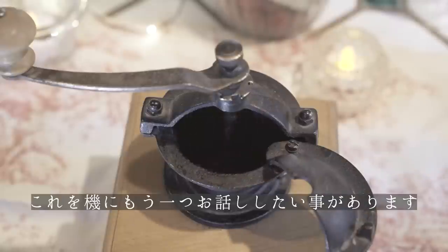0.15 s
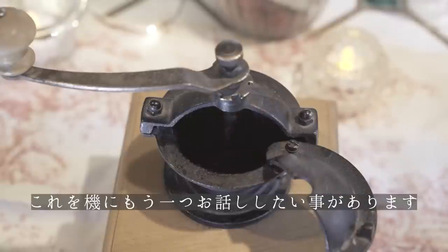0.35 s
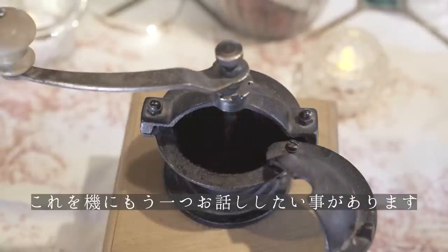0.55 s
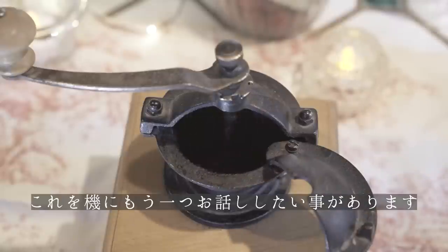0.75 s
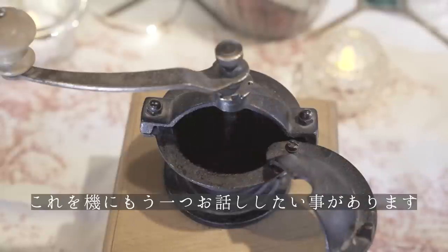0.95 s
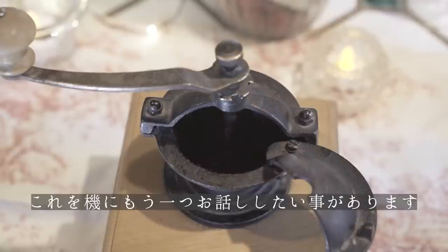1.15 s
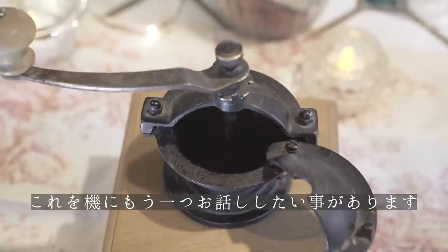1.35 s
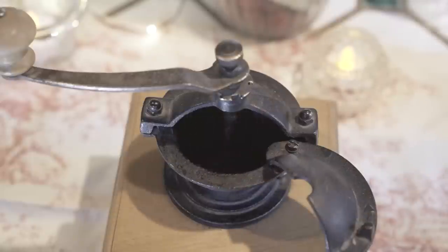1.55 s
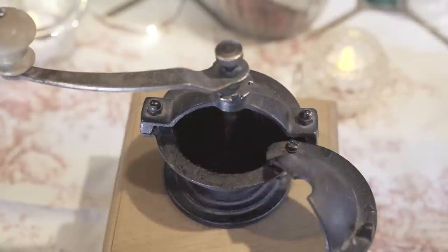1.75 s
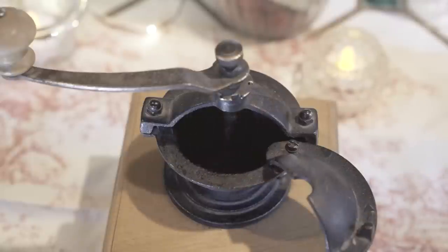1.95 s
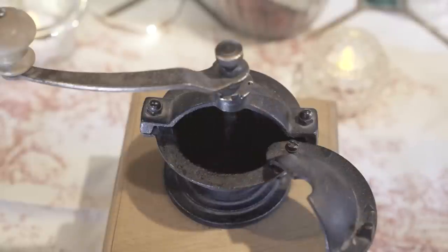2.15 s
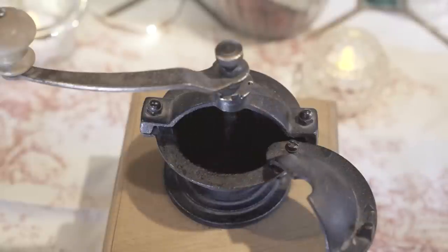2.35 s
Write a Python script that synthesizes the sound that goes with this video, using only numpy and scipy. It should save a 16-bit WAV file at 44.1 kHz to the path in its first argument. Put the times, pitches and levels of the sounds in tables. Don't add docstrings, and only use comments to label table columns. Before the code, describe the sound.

Coffee beans pour in uneven bursts into a hand grinder's cast metal hopper, ticking and pinging brightly, with small wooden box knocks and one lid clink midway; close microphone, small quiet kitchen, mono.

```python
import sys
import numpy as np
from scipy import signal
from scipy.fft import rfft, irfft
from scipy.io import wavfile

SR = 44100
rng = np.random.default_rng(int(sys.argv[2]) if len(sys.argv) > 2 else 0)


def attenuation_scalar(level_db):
    decades = np.asarray(level_db, float) / 20
    return 10 ** decades


def output_pcm(signal):
    pcm = np.clip(np.atleast_2d(signal).T, -1, 1) * 32767
    wavfile.write(sys.argv[1], SR, np.round(pcm).astype(np.int16))


N = 112455

# f/Hz, level/dB, t60/s
HOPPER_MODES = [(873, -16.5, 0.011), (1620, -16.5, 0.035), (1780, -8.5, 0.016), (3470, -10, 0.012),
                (4735, -11, 0.043), (6050, -3.5, 0.0118), (6300, -19, 0.017), (7300, -5, 0.015),
                (7570, -15.5, 0.09), (8590, -14.5, 0.1), (9330, -8.5, 0.019), (10100, -10.5, 0.046),
                (11500, -34, 0.052)]


def cut(x, hz, kind, order=4):
    return signal.sosfilt(signal.butter(order, hz, kind, fs=SR, output="sos"), x)


def at_hz(points, hz):
    f, db = np.array(points).T
    return np.interp(np.log(hz), np.log(f), db)


def ring(clicks, hz, t60):
    r, w = attenuation_scalar(-60 / (t60 * SR)), 2 * np.pi * hz / SR
    return signal.lfilter([.5, 0, -.5], [1, -2 * r * np.cos(w), r * r], clicks + 1e-18)


def pings(rows, rise_s, t60):
    out, t = np.zeros(N + 4000), np.arange(4000) / SR
    for s, db, hz in rows:
        i = int(s * SR)
        envelope = attenuation_scalar(db - 60 * t / t60) * (1 - np.exp(-t / rise_s))
        out[i:i + len(t)] += envelope * np.sin(2 * np.pi * hz * t)
    return out[:N]


def random_sizes(spread_db):
    size_db = spread_db * np.minimum(rng.exponential(1, N), 4)
    sizes = attenuation_scalar(size_db) * rng.choice([-1, 1], N)
    return sizes / np.sqrt(np.mean(sizes ** 2))


def flow():
    # t/s, level/dB, brightness/(dB per octave), hopper ring/dB
    pours = [
        [(.172, -65, -21, -19), (.2, -51.5, -14.5, -13), (.235, -66, -15.5, -10), (.305, -53.5, -18, 11),
         (.313, -38, -12, 17.5), (.36, -34.5, 3.5, 9.5), (.43, -38, -9.5, 13), (.54, -64, -14, 21.5)],
        [(.545, -54, -3, 7), (.57, -42.5, -12, 17.5), (.66, -43, -2, 10), (.84, -35, 5, 4.5),
         (.95, -42, 4, 5.5), (1.0, -44.5, 12, 0.5), (1.085, -47.5, -1, 10)],
        [(1.3, -72, 4, 3), (1.32, -37.5, -1.5, 9), (1.43, -73.5, -18, -4.5), (1.44, -52.5, -3, 6),
         (1.495, -71.5, -4, -4.5)],
        [(1.5, -46.5, 4.5, 6.5), (1.53, -31, 1, 14), (1.57, -33.5, -7, 14.5), (1.6, -36.5, -1.5, 12.5),
         (1.65, -48, -11, 16.5), (1.85, -42, -2, 16), (2.15, -32.5, 7, -1.5), (2.24, -35, 8.5, 3),
         (2.35, -58.5, 8.5, -5)],
        [(2.49, -64, 3.5, -15.5), (2.55, -87, 6, -17.5)],
    ]
    t = np.arange(N) / SR
    s, *columns = np.concatenate(pours).T
    level_db, bright_db, ring_db = [np.interp(t, s, c) for c in columns]
    pouring = sum((t >= p[0][0]) & (t < p[-1][0]) for p in pours) > 0
    return attenuation_scalar(level_db) * pouring, bright_db, ring_db


def pour():
    # f/Hz, level/dB
    tick_colour = [(1180, -55), (2000, 3), (2890, -24.5), (3370, -17.5), (3940, 3.5), (6300, 6),
                   (15500, -10.5)]
    # f/Hz, t60/s
    bowl_modes = [(3250, .014), (3420, .016), (3600, .014)]
    ticks_per_s, spread_db, clump_db = 5000, 4, 1.5
    tick_cycles, tick_from_hz, bright_from_hz = 20, 4830, 6750
    flow_db, bowl_db = -24, -28
    scoop_hz, scoop_db, scoop_t60_s, scoop_until_s = 4650, -5.5, 0.0065, 0.42

    gain, bright_db, ring_db = flow()
    clump = signal.lfilter([1], [1, -.995], rng.standard_normal(N)) / 10
    clicks = random_sizes(spread_db) * (rng.random(N) < ticks_per_s / SR)
    clicks = clicks * attenuation_scalar(clump_db * clump) * gain * np.sqrt(SR / ticks_per_s)

    pitches, dealt = np.geomspace(2000, 15700, 28), rng.integers(0, 28, N)
    weights = attenuation_scalar(at_hz(tick_colour, pitches)) * pitches
    weights = weights / np.sqrt(np.mean(weights ** 2 * tick_cycles / pitches * SR / 28))
    out = 0
    for k, hz in enumerate(pitches):
        brightness = attenuation_scalar(bright_db * np.log2(hz / bright_from_hz))
        out = out + weights[k] * ring(clicks * (dealt == k) * brightness, hz, tick_cycles / hz)
    out = cut(out, tick_from_hz, "high", order=2)

    turns = rng.integers(0, 12, (len(HOPPER_MODES) + len(bowl_modes) + 1, N)) == 0
    ringing = clicks * attenuation_scalar(ring_db)
    for (hz, db, t60), turn in zip(HOPPER_MODES, turns):
        out = out + attenuation_scalar(db + flow_db) * ring(ringing * turn, hz, t60)
    for (hz, t60), turn in zip(bowl_modes, turns[len(HOPPER_MODES):]):
        out = out + attenuation_scalar(bowl_db) * ring(ringing * turn, hz, t60)
    in_scoop = turns[-1] * (np.arange(N) < scoop_until_s * SR)
    return out + attenuation_scalar(scoop_db) * ring(clicks * attenuation_scalar(-ring_db) * in_scoop, scoop_hz, scoop_t60_s)


def beans():
    # t/s, peak level/dB, f/Hz
    early = [(0.177, -38, 4820), (0.193, -29, 4440), (0.2077, -27, 4220), (0.2507, -36, 4900),
             (0.265, -43, 4600), (0.3105, -26, 8000), (0.322, -19.5, 4370), (0.3226, -27, 4360),
             (0.332, -34, 4500), (0.352, -15, 3470), (0.376, -15, 3540), (0.417, -16, 3350),
             (0.5628, -32.5, 6400), (0.648, -32.5, 6600), (0.7008, -29, 8800), (0.7274, -26, 5900),
             (0.721, -23, 10000), (.785, -23, 4900), (0.796, -21, 7800), (0.8053, -14, 10100),
             (0.884, -21.5, 6770), (0.8915, -22.5, 8950), (0.9569, -16.5, 5450), (0.9856, -20.5, 9130),
             (1.021, -21, 8930), (1.0277, -23.5, 9550), (1.0903, -14.5, 9600), (1.094, -13.5, 11500)]
    late = [(1.201, -40.5, 8600), (1.233, -45.5, 5450), (1.2493, -46, 6000), (1.2851, -43.5, 5000),
            (1.2999, -31.5, 5130), (1.3082, -24, 6000), (1.3132, -16, 7000), (1.321, -22, 9670),
            (1.33, -18, 10300), (1.35, -24.5, 4630), (1.399, -27.5, 5200), (1.408, -38, 8000),
            (1.4347, -16, 8660), (1.4391, -29, 7200), (1.4535, -23, 6760), (1.465, -26.5, 7280),
            (1.501, -29, 11200), (1.507, -28, 7300), (1.513, -20, 12000), (1.5256, -14.5, 4000),
            (1.5446, -22, 6550), (1.5613, -21.5, 6030), (1.5715, -22.5, 5700), (1.5896, -18.5, 6200),
            (1.597, -20, 7540), (1.6867, -32.5, 6100), (1.7399, -18.5, 5050), (1.8571, -21, 5000),
            (1.872, -13, 6130), (1.949, -23.5, 9330), (2.027, -18, 6370), (2.061, -22.5, 6070),
            (2.1343, -17, 6050), (2.175, -20, 13900), (2.1841, -18, 6200), (2.1933, -17, 8590),
            (2.3201, -32.5, 7100), (2.3349, -32, 6960)]
    settling = [
        (2.478, -62.5, 4370),
        (2.4891, -54.5, 4520),
        (2.5054, -48, 4250),
    ]
    snap_db, snap_t60_s, rise_s = -3.5, 0.014, 0.00032
    crack_db, crack_t60_s, crack_octaves, crack_from_hz = 1.5, 0.011, 0.97, 3030
    hopper_db, bean_from_hz = -10, 1420
    reach_db = -8.5

    rows = np.array(early + late + settling)
    out, t = np.zeros(N + 2000), np.arange(2000) / SR
    noise = rng.standard_normal((len(rows), len(t)))
    mix_db = rng.normal(0, 6.1, (len(rows), len(HOPPER_MODES)))
    rise = 1 - np.exp(-t / rise_s)
    for (s, db, hz), grit in zip(rows, noise):
        i = int(s * SR)
        edges = np.clip(hz * 2 ** np.array([-crack_octaves, crack_octaves]), crack_from_hz, 19000)
        crack = cut(grit * attenuation_scalar(crack_db - 60 * t / crack_t60_s), edges, "band", order=3)
        snap = attenuation_scalar(snap_db - 60 * t / snap_t60_s) * np.sin(2 * np.pi * hz * t)
        out[i:i + len(t)] += attenuation_scalar(db) * rise * (crack + snap)

    starts, peak_db, pitch = (rows[:, 0] * SR).astype(int), rows[:, 1], rows[:, 2]
    for (hz, db, t60), own_db in zip(HOPPER_MODES, mix_db.T):
        far_db = reach_db * abs(np.log2(hz / pitch))
        clicks = np.zeros(len(out))
        clicks[starts] = attenuation_scalar(peak_db + db + own_db + hopper_db + far_db)
        out += ring(clicks, hz, t60)
    return cut(out[:N], bean_from_hz, "high")


def bowl():
    # t/s, peak level/dB, f/Hz
    early = [(0.5766, -34, 3200), (0.609, -32, 3600), (0.6863, -38.5, 3330), (0.7347, -42, 3450),
             (0.7552, -33, 3366), (0.7781, -34, 3300), (0.7919, -29.5, 3385), (0.8051, -22.5, 3413),
             (0.8144, -42.5, 3500), (0.8284, -35, 3540), (0.8784, -36.5, 3470), (0.8834, -40.5, 3470),
             (0.9339, -37, 3330), (1.4351, -28.5, 3370), (1.4566, -29, 3480), (1.4654, -40, 3550)]
    late = [(1.5803, -26.5, 3280), (1.5928, -22.5, 3440), (1.6014, -30, 3420), (1.6711, -42, 3350),
            (1.6851, -27, 3470), (1.6954, -29.5, 3350), (1.716, -29.5, 3450), (1.7394, -31, 3470),
            (1.7844, -33, 3380), (1.8412, -36, 3510), (1.8721, -28.5, 3420), (1.9036, -44, 3450),
            (1.9245, -50, 3560), (1.9485, -31, 3320), (1.9629, -33, 3330), (2.0028, -47, 3470),
            (2.0164, -34, 3330), (2.0248, -29.5, 3385), (2.0424, -32, 3470), (2.0981, -36.5, 3320),
            (2.1226, -33, 3320), (2.1635, -34.5, 3230), (2.1839, -31, 3365), (2.1934, -33, 3600),
            (2.2543, -36, 3275), (2.2817, -36.5, 3360)]
    return attenuation_scalar(7) * pings(early + late, rise_s=.0012, t60=.02)


def lid():
    # t/s, peak level/dB
    touches = [
        (1.5255, -20.5),
    ]
    # f/Hz, level/dB, t60/s
    modes = [(1725, -3, .2), (1758, -7, .17), (2150, 0, .012), (2440, 0, .015), (2900, 0, .012),
             (3500, -1, .012), (4100, -1, .012), (4622, -4, .14), (4661, -6, .14)]
    clicks = np.zeros(N)
    for s, db in touches:
        clicks[int(s * SR)] = attenuation_scalar(db)
    ringing = sum(attenuation_scalar(db) * ring(clicks, hz, t60) for hz, db, t60 in modes)
    return cut(ringing, 1420, "high")


def box():
    # t/s, peak level/dB, extra level of the deep modes/dB, f of the blow/Hz
    knocks = [(0.207, -35.5, 13, 816), (0.213, -27, -15, 980), (.241, -28.5, 4.5, 980),
              (.346, -36, -20, 860), (.364, -29.5, -31, 633), (0.386, -30.5, -22, 790),
              (0.417, -26, -34, 745), (0.439, -35, -21, 710), (0.529, -28.5, -0.5, 1180),
              (0.566, -30, 4.5, 996), (1.317, -53.5, -18, 606), (1.433, -50, -15, 830),
              (1.571, -27, -12, 677), (1.595, -28.5, -12, 667), (1.621, -37.5, -10, 616),
              (1.687, -42.5, -23, 990), (1.713, -39.5, -15, 820), (1.752, -40.5, -18, 890),
              (1.848, -44.5, -14, 1110), (1.924, -36.5, 8, 830), (1.934, -30.5, -9, 933),
              (1.976, -40, -2, 700), (2.26, -30.5, -17, 960), (2.277, -34.5, 4.5, 857),
              (2.296, -57, 4, 1150)]
    # f/Hz, level/dB, t60/s
    modes = [(239, -16.5, 0.017), (280, -8, 0.02), (424.4, -7.5, 0.013), (644, -14.5, 0.022),
             (849, -7.5, 0.012), (963, -2.5, 0.0081), (1150, -11.5, 0.062)]
    blow_db, wood_db, deep_below_hz = -5.5, -2.5, 350
    rumble_per_s, rumble_db, rumble_s = 800, -5.5, 0.014

    t = np.arange(N) / SR
    grit = random_sizes(1.0) * (rng.random(N) < rumble_per_s / SR) * attenuation_scalar(rumble_db)
    mix_db = rng.normal(0, 2.24, (len(knocks), len(modes)))
    out = attenuation_scalar(3.5) * pings(np.array(knocks)[:, [0, 1, 3]], rise_s=0.00096, t60=0.02)
    for (hz, mode_db, t60), own_db in zip(modes, mix_db.T):
        push = np.zeros(N)
        for (s, db, deep_db, _), own in zip(knocks, own_db):
            i = int(s * SR)
            gain = attenuation_scalar(db + own + deep_db * (hz < deep_below_hz))
            push[i] += gain * attenuation_scalar(blow_db)
            push[i:] += gain * grit[i:] * np.exp(-t[:N - i] / rumble_s)
        out = out + attenuation_scalar(mode_db + wood_db) * ring(push, hz, t60)
    return cut(cut(out, 1137, "low", order=6), 182, "high")


def table():
    # t/s, peak level/dB
    thumps = [
        (0.24, -44.5),
        (0.432, -49.5),
        (1.6, -43),
        (1.628, -43.5),
        (1.76, -48.5),
        (1.961, -57.5),
    ]
    mode_hz, t60_s, push_s = 121, 0.14, 0.0035
    clicks, push = np.zeros(N), np.hanning(int(2 * push_s * SR))
    for s, db in thumps:
        clicks[int(s * SR)] = attenuation_scalar(db)
    t = np.arange(N // 4) / SR
    swell = np.convolve(push / push.sum(), attenuation_scalar(-60 * t / t60_s))
    tone = np.sin(2 * np.pi * mode_hz * np.arange(len(swell)) / SR)
    return signal.fftconvolve(clicks, swell * tone)[:N]


def kitchen(x):
    t60_s, treble_t60_s, split_hz, onset_s = .2, 0.099, 6900, 0.013
    t = np.arange(SR // 2) / SR
    low, high = rng.standard_normal((2, len(t)))
    tail = cut(low, split_hz, "low", order=2) * attenuation_scalar(-60 * t / t60_s)
    tail = tail + cut(high, split_hz, "high", order=2) * attenuation_scalar(-60 * t / treble_t60_s)
    tail = tail * np.minimum(t / onset_s, 1)
    return signal.fftconvolve(x, tail / np.sqrt(np.sum(tail ** 2)))[:N]


def air():
    # f/Hz, level/dB per Hz
    colour = [(41, 4.5), (60, -3.5), (330, -5), (700, -7), (1100, -15), (2200, -24.5), (6000, -28),
              (15800, -35.5)]
    hz = np.maximum(np.fft.rfftfreq(N, 1 / SR), 10)
    spectrum = rfft(rng.standard_normal(N)) * attenuation_scalar(at_hz(colour, hz)) * (hz > 34)
    x = irfft(spectrum, N)
    return attenuation_scalar(-67.5) * x / x.std()


def scene():
    rattle = pour() + lid() + box()
    hits = beans() + bowl()
    room = attenuation_scalar(-5) * kitchen(rattle + attenuation_scalar(-6) * hits)
    return (rattle + hits + room + table() + air())[None]


def top_cut(x):
    return signal.sosfilt(signal.butter(12, 16830, fs=SR, output="sos"), x)


def record(dry):
    low_pass = signal.cheby2(10, 30, 16300, fs=SR, output="sos")
    mix = signal.sosfilt(low_pass, dry)
    return top_cut(mix)


dry = scene()
out = record(dry)
output_pcm(out)
```